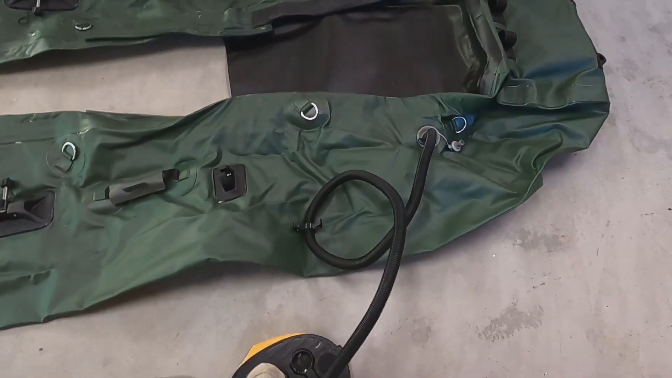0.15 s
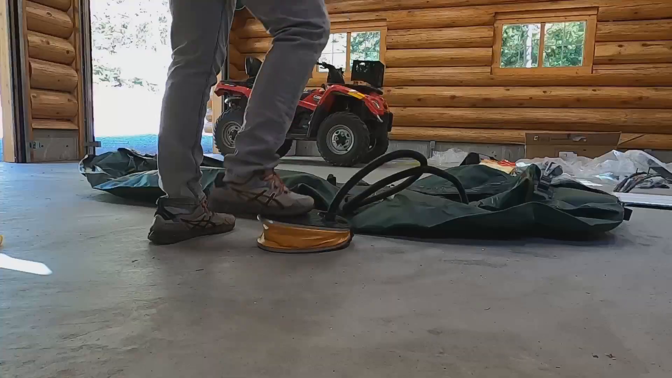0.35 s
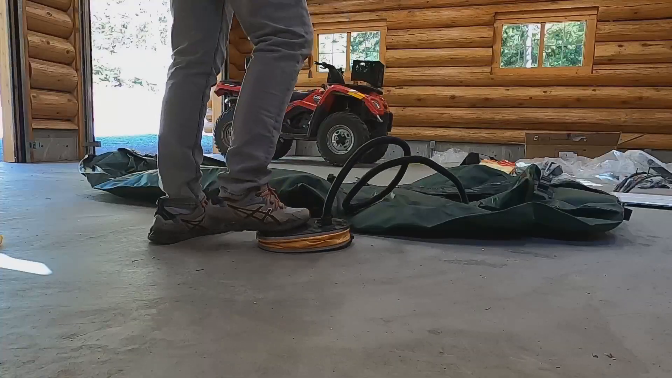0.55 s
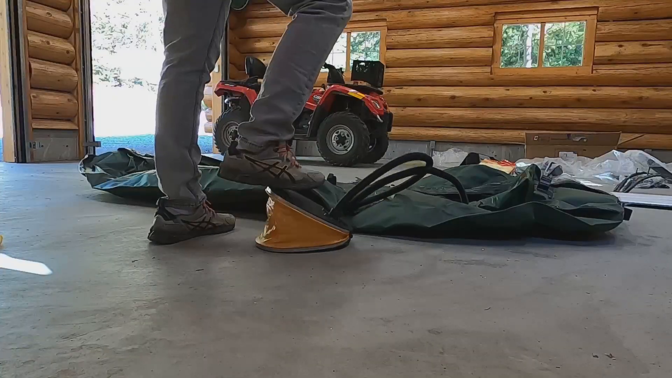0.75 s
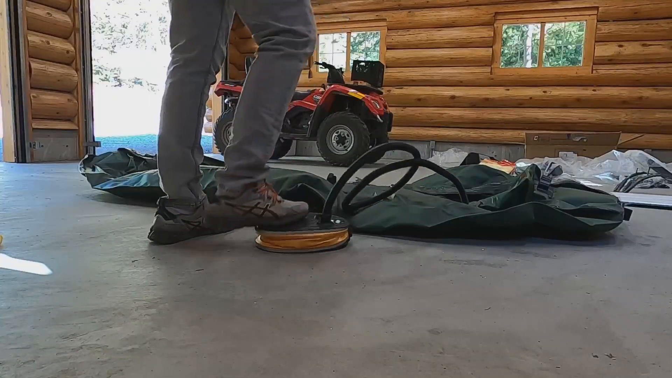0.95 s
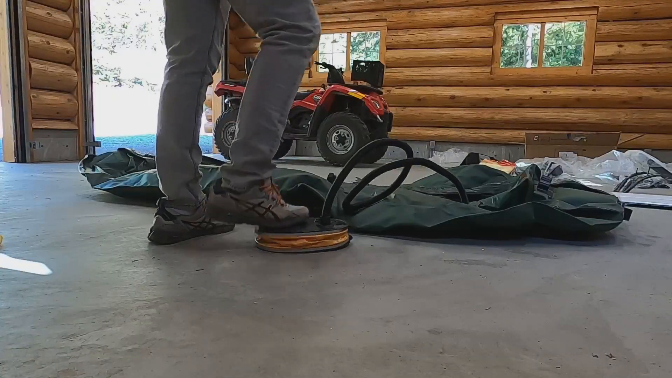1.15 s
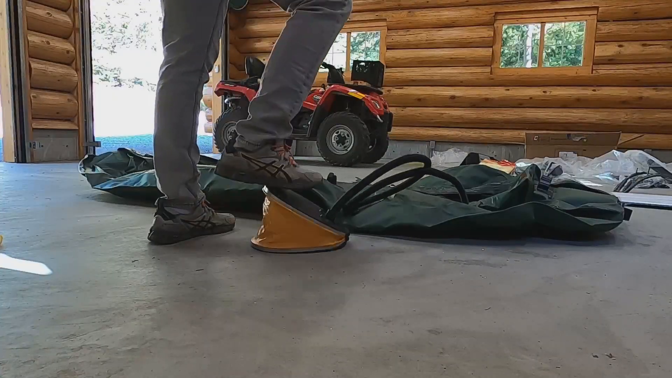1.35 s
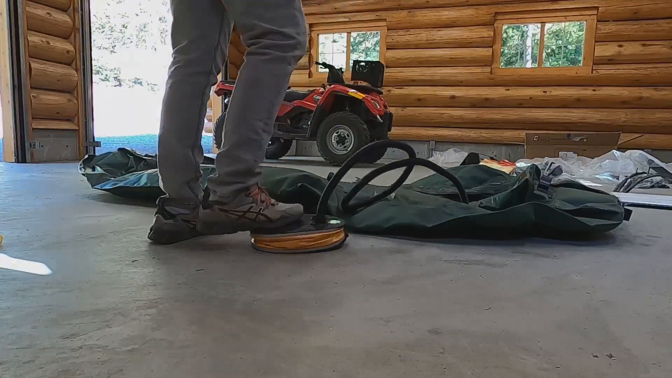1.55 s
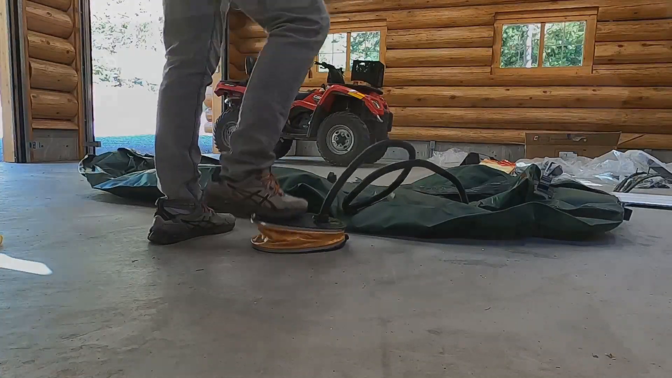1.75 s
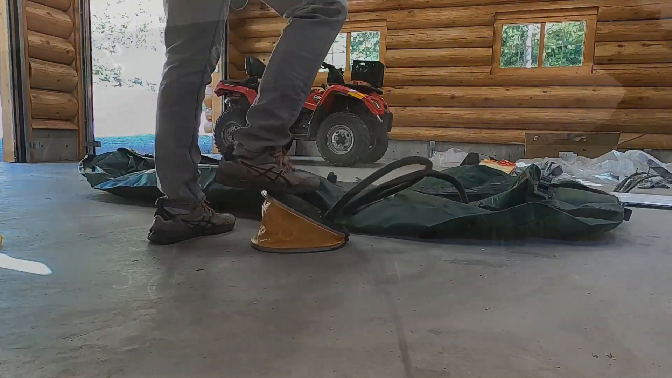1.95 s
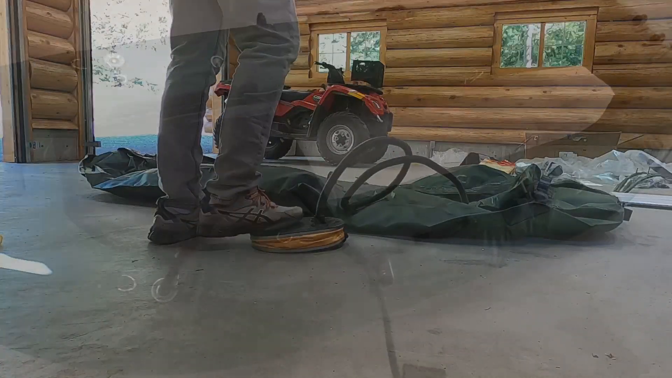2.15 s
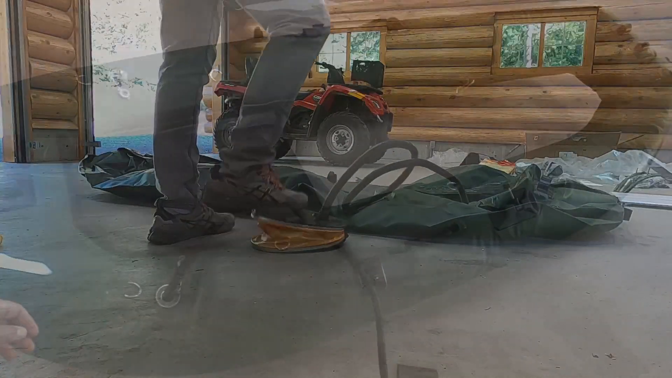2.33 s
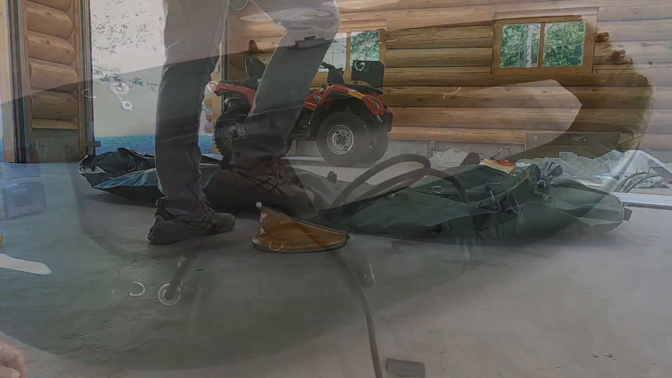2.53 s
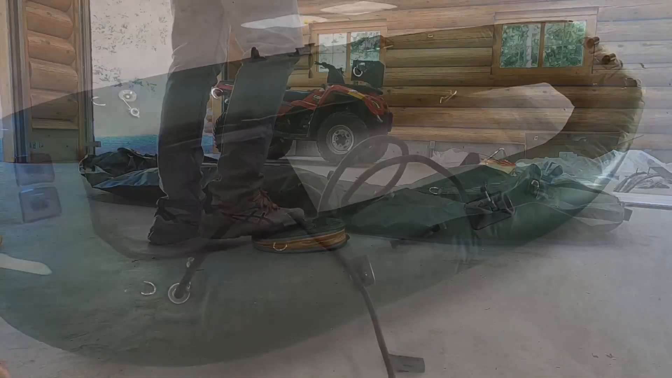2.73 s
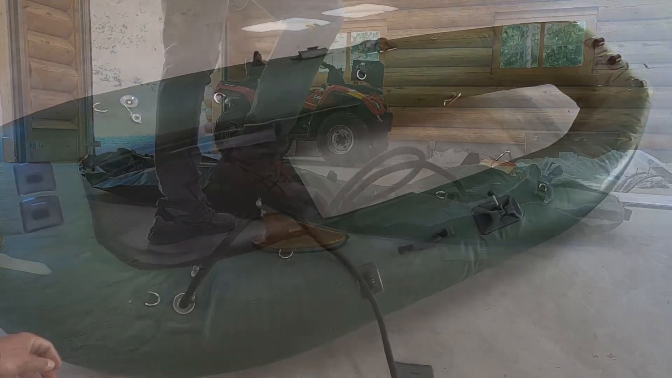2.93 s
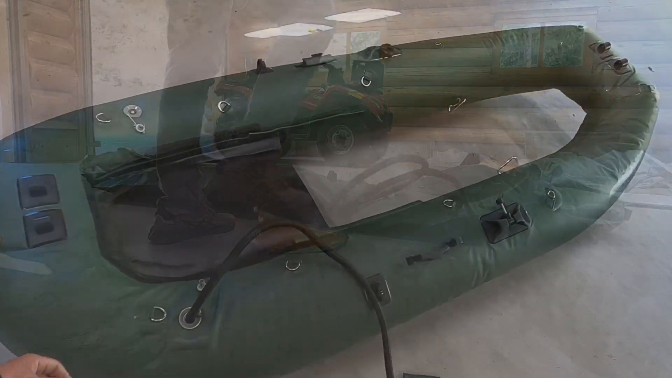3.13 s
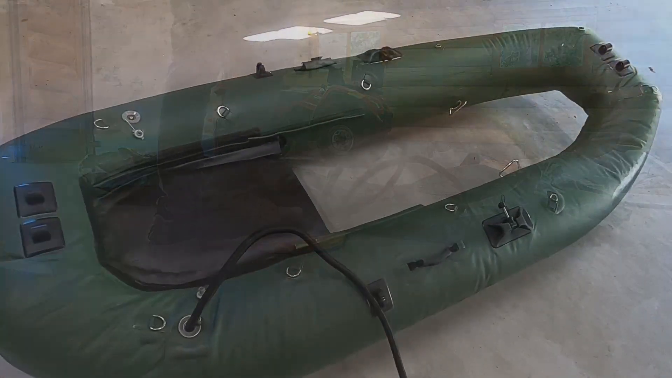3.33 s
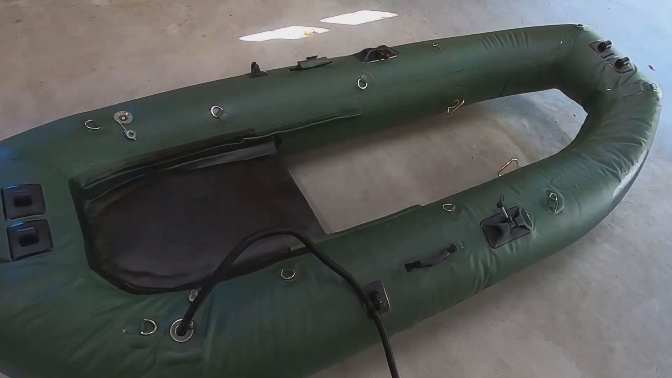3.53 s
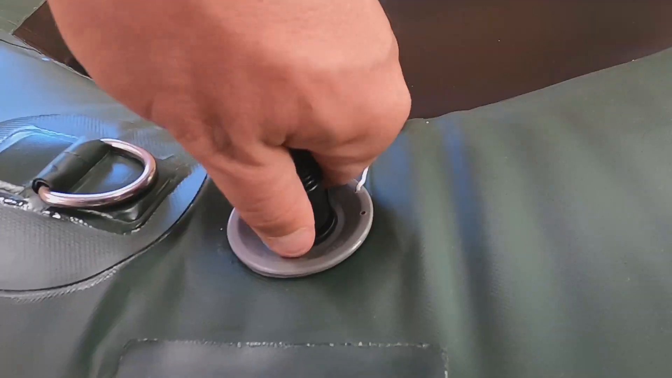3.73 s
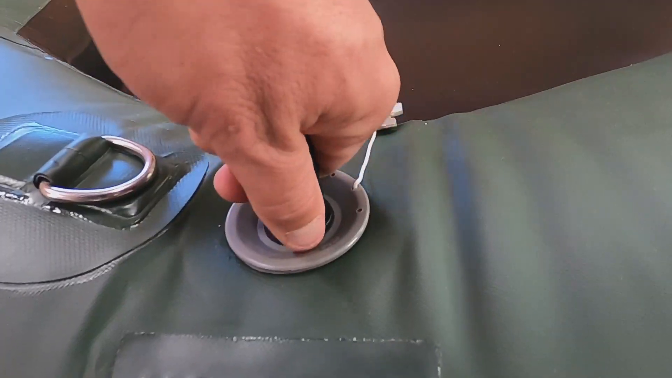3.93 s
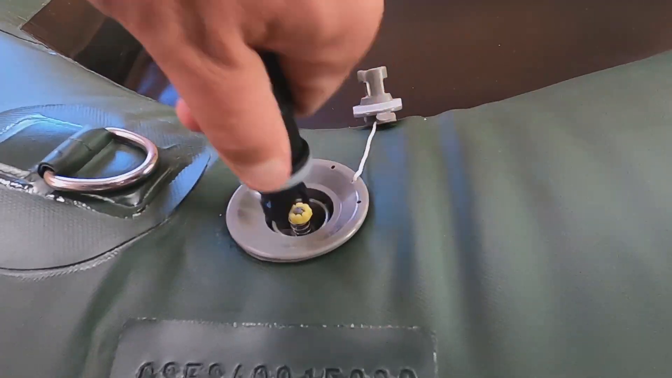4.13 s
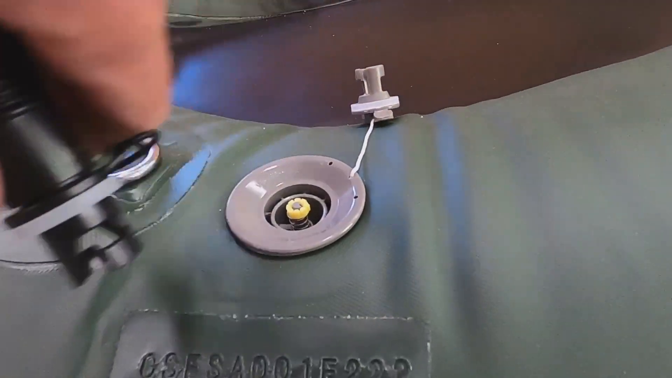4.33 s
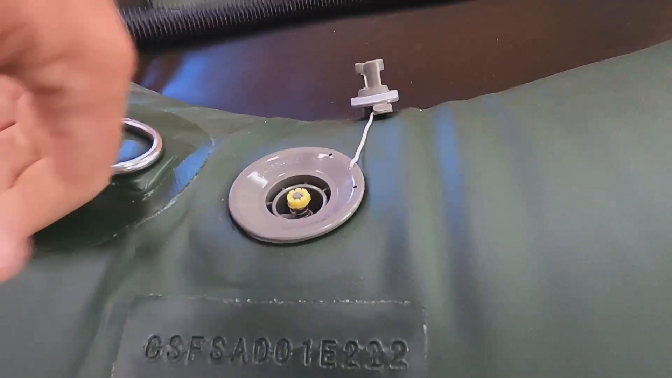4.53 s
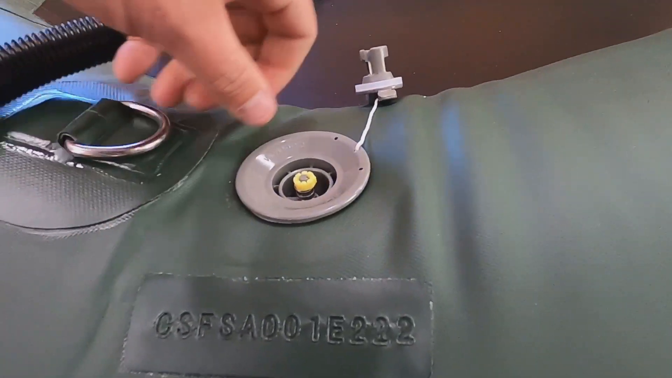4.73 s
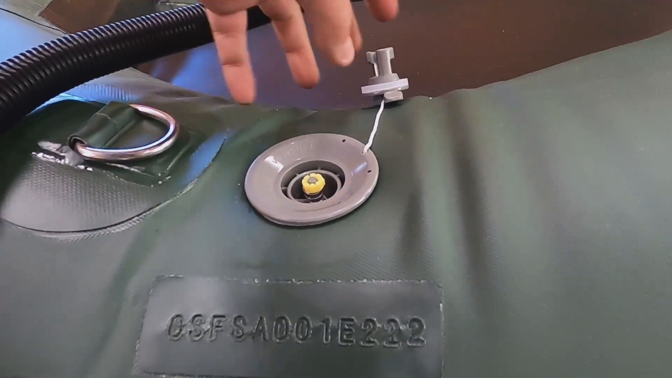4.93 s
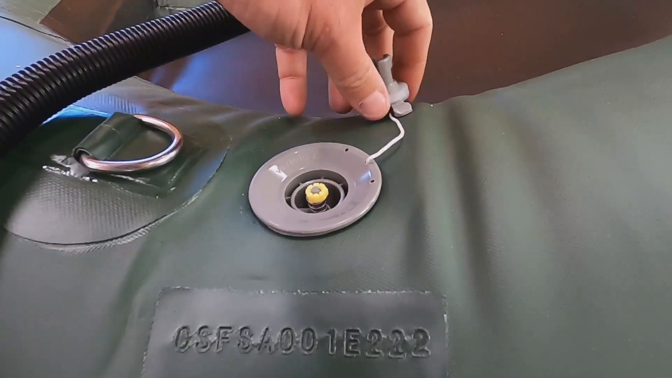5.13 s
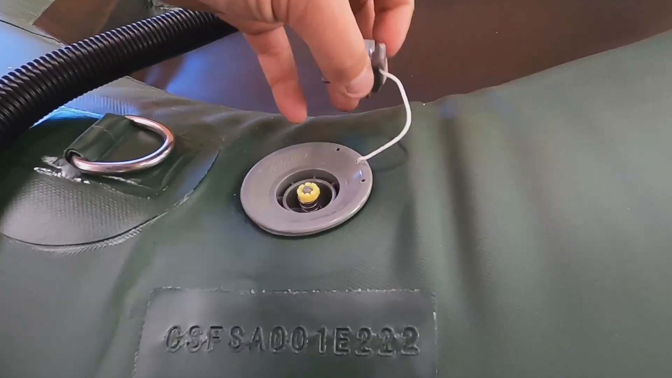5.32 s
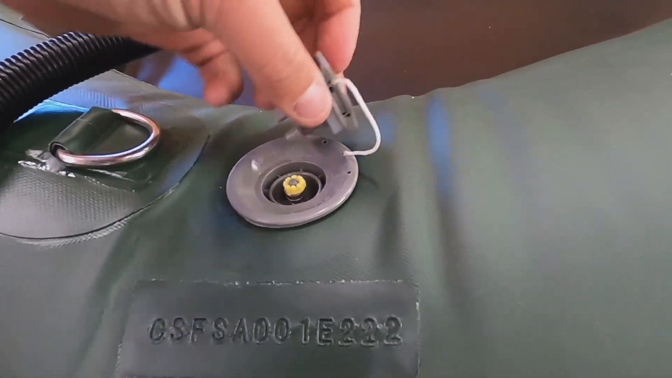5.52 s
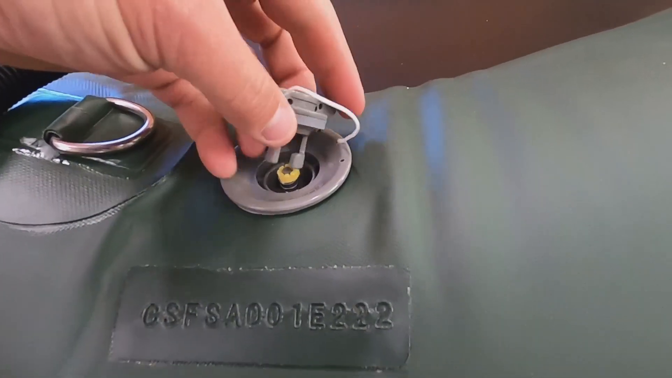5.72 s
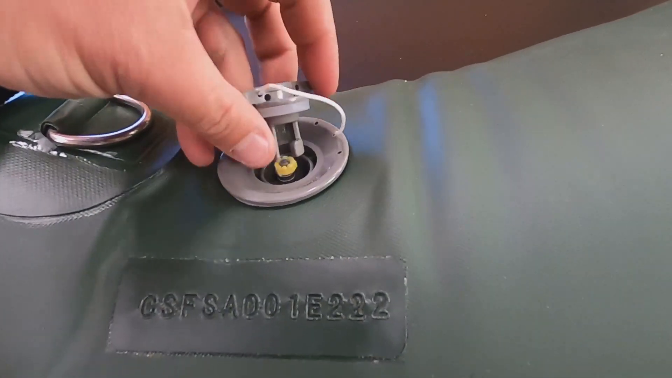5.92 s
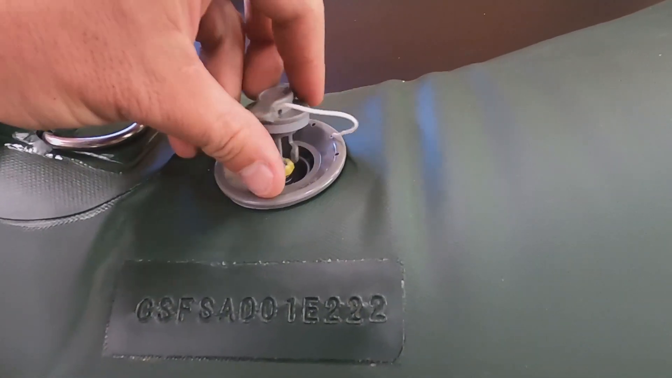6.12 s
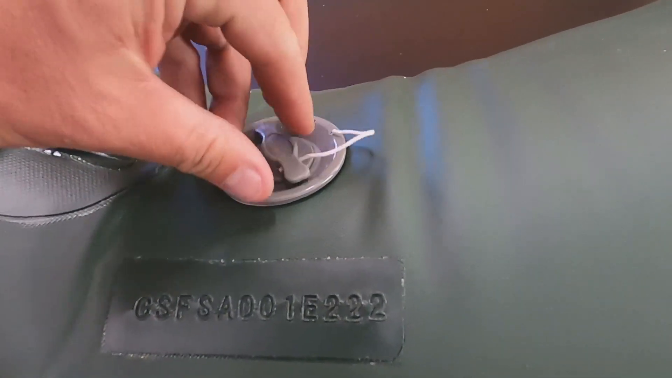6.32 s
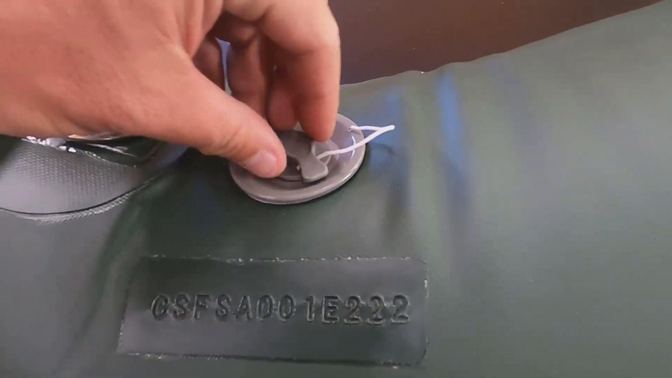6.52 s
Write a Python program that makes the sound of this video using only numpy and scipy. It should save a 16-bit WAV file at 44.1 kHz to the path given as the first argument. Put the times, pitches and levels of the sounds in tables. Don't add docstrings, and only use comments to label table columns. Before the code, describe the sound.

Garage echo surrounds a foot pump. From 0 to 0.34 s, one tread thumps and air hisses with a high whistle before a hard cut. Knocks and slaps at 0.4 s start a steady rhythm, with presses near 0.45, 1.0, 1.55, 2.15 and 2.7 s. Each brings a rough rush of air and wavering whistles around 5 to 6 kHz, then a brief hoarse bellows wheeze. From 2.3 s the whistles drop lower; around 3.1 to 3.5 s only faint notes near 3 kHz and weak breaths of air remain, with a last knock at 3.67 s. At 3.72 s everything becomes close and quiet. A seal creaks softly, rising then easing, and a sharp puff bursts at 4.12 s. Hose bumps and scuffs follow until 5.3 s. After near silence, the cap ticks and scrapes from 5.88 s, clattering brightest at 6.3 to 6.5 s.

```python
import sys
import numpy as np
from scipy import signal
from scipy.fft import rfft, irfft, next_fast_len
from scipy.io import wavfile
from scipy.ndimage import uniform_filter1d

SR = 44100
rng = np.random.default_rng(int(sys.argv[2]) if len(sys.argv) > 2 else 0)


def pcm_store(signal):
    levels = np.round(np.clip(np.atleast_2d(signal), -1, 1) * 32767)
    wavfile.write(sys.argv[1], SR, levels.astype(np.int16).T)


def volts_from_decibels(level):
    exponent = np.asarray(level, float) / 20
    return 10 ** exponent


N = 294147


def read(points, hz):
    f, value = np.transpose(points)
    return np.interp(np.log(hz + 1), np.log(f + 1), value)


def evened(x):
    return x / np.sqrt(np.mean(x ** 2) + 1e-20)


CUTS = [
    0,
    .336,
    3.724,
    6.67,
]


def add(mix, s, sound):
    end = min(cut for cut in CUTS if cut > s + .002)
    part = mix[..., round(s * SR):round(end * SR)][..., :sound.shape[-1]]
    part += sound[..., :part.shape[-1]]


def follow(tables, column):
    t, out = np.arange(N) / SR, np.full(N, -120.)
    for rows in tables:
        rows = np.array(rows)
        inside = (t >= rows[0, 0]) & (t <= rows[-1, 0])
        out[inside] = np.interp(t[inside], rows[:, 0], rows[:, column])
    return uniform_filter1d(out, size=64)


def resonate(x, hz, width_hz):
    turn = np.exp(2j * np.pi * np.cumsum(hz * np.ones(len(x))) / SR)
    r = np.exp(-np.pi * width_hz / SR)
    return 2 * (turn * signal.lfilter([1 - r], [1, -r], x / turn)).real


def narrow(x, hz, width_hz):
    pole = np.exp((2j * hz - width_hz) * np.pi / SR)
    return evened(signal.lfilter([1], np.poly([pole] * 3), x).real)


def ring(hz, db, t60, fuzz, rise):
    noise = rng.standard_normal(12000)[:round(1.5 * t60 * SR)]
    t = np.arange(len(noise)) / SR
    tone = (1 - fuzz) * np.sin(2 * np.pi * hz * t) + fuzz * narrow(noise, hz, 1.545 * hz)
    attack = np.sin(np.pi / 2 * np.minimum(t / rise, 1)) ** 2
    return volts_from_decibels(db - 60 * t / t60) * tone * attack


# frequency in Hz, likeness from 0 to 1.
LIKENESS = [(60, 0.94), (180, 1), (550, 0.78), (1650, 0.94), (4970, 0.16), (15000, 0.06)]


def hiss(colour, patchy_db, flicker_db, size=512):
    hop, hz = size // 4, np.fft.rfftfreq(size, 1 / SR)
    a, b, c, d, patches = rng.standard_normal((N // hop + 5, len(hz), 5)).T
    patches = uniform_filter1d(patches, size=5, axis=0)
    patches = evened(uniform_filter1d(patches, size=12, axis=1))
    flicker = evened(uniform_filter1d(patches[1] + a[0], size=3))
    same = np.clip(read(LIKENESS, hz), -1, 1)[:, None]
    left = a + 1j * b
    right = same * left + np.sqrt(1 - same ** 2) * (c + 1j * d)
    level_db = read(colour, hz)[:, None] + patchy_db * patches + flicker_db * flicker
    z = np.array([left, right]) * volts_from_decibels(level_db)
    return evened(signal.istft(z, nperseg=size, noverlap=size - hop)[1][:, :N])


# time in seconds, level in dB.
THIN_AIR = [
    [(0, -44.5), (.135, -44.5)],
    [(.336, -48.5), (2.4, -49), (3.2, -52), (3.724, -55.5)],
    [(3.724, -81), (3.8, -63), (3.92, -52.5), (4.1, -58)],
    [(4.19, -66), (5.2, -76.5), (5.45, -83.5), (5.88, -83.5), (6.05, -79), (6.67, -80.5)],
]
# frequency in Hz, level in dB per Hz.
ROAR_COLOUR = [(290, -43.5), (500, -5), (696, -12.5), (1070, 2.5), (1590, -6.5), (1920, 0.5), (2430, -0.5),
               (4550, -8), (5200, -11), (7000, -13), (9100, -22.5), (15400, -120)]
# frequency in Hz, level in dB per Hz.
FIZZ_COLOUR = [(3710, -26), (6300, -10), (7700, -8.5), (8100, -20.5), (8500, -9), (10000, -9.5),
               (11000, -12.5), (12200, -10), (13000, -14), (13800, -20.5), (14600, -27), (15600, -89)]


def airflow():
    roar, fizz = hiss(ROAR_COLOUR, 3.4, 0.94), hiss(FIZZ_COLOUR, 6.0, 0.83)
    return volts_from_decibels(follow(THIN_AIR, column=1)) * (volts_from_decibels(3.5) * roar + volts_from_decibels(-24.0) * fizz)


# time in seconds, boom in dB, rustle in dB.
SHAKES = [(0, -24.5, -34.5), (0.198, -50, -32), (0.458, -23.5, -31), (1.002, -26, -40), (1.6, -34, -33),
          (2.2, -31, -35), (2.72, -35, -37.5), (3.73, -51.5, -65), (3.86, -61, -48.5), (3.98, -70, -51),
          (4.122, -36, -33), (4.601, -39, -46.5), (4.851, -42.5, -50), (5.079, -43.5, -59.5),
          (5.3, -50, -67), (5.73, -69.5, -75), (5.95, -56.5, -53.5), (6.397, -34, -37.5)]
SWELL_DB_PER_S, SETTLE_DB_PER_S = [64, 105, 599.5], [43.5, 107.5, 113]


def shaken(column, bed_db):
    t, power = np.arange(N) / SR, volts_from_decibels(bed_db) ** 2
    for row in SHAKES:
        take = np.searchsorted(CUTS, row[0], "right") - 1
        inside = slice(round(CUTS[take] * SR), round(CUTS[take + 1] * SR))
        late = t[inside] - row[0]
        change_db = np.minimum(SWELL_DB_PER_S[take] * late, -SETTLE_DB_PER_S[take] * late)
        power[inside] += volts_from_decibels(row[column] + change_db) ** 2
    return np.sqrt(power)


# frequency in Hz, level in dB per Hz.
BOOM_COLOUR = [(12, -46.5), (20, -26.5), (59, -4.5), (102, -10.5), (134, 6), (161, 9), (269, -0.5),
               (367, -6.5), (500, -17.5), (650, -48.5), (1100, -120)]
# frequency in Hz, level in dB per Hz.
RUSTLE_COLOUR = [(180, -27), (300, 10.5), (333, -20.5), (472, -1.5), (674, -7.5), (1650, -11.5),
                 (2400, -35), (3120, -58.5), (5280, -120)]
BOOM_BED_DB, RUSTLE_BED_DB = 5.5, 2.5


def body():
    boom, rustle = hiss(BOOM_COLOUR, 3., 1.5, size=1024), hiss(RUSTLE_COLOUR, 2.5, 1.5)
    bed_db = follow(THIN_AIR[:2] + THIN_AIR[3:], column=1)
    boom = shaken(column=1, bed_db=bed_db + BOOM_BED_DB) * boom
    return boom + shaken(column=2, bed_db=bed_db + RUSTLE_BED_DB) * rustle


# time in seconds, knock in dB, knock in Hz, hinge crack in dB.
TREADS = [(0.137, -9.5, 526, -33.5), (0.217, -16.5, 1020, -21.5), (0.396, -7.5, 1044, -21.5),
          (0.423, -15, 1010, -31), (0.448, -14.5, 556, -32.5), (0.946, -22.5, 403, -52),
          (0.995, -17, 940, -34.5), (1.019, -13.5, 933, -29.5), (1.5256, -13.5, 868, -21),
          (1.5625, -10.5, 1040, -37.5), (1.575, -16.5, 564, -35), (2.063, -18, 1064, -34.5),
          (2.134, -14.5, 1014, -45.5), (2.156, -17, 600, -39), (2.1646, -12.5, 1005, -39.5),
          (2.634, -16.5, 1080, -37.5), (2.669, -24, 1070, -43.5), (2.688, -16, 930, -40),
          (2.96, -18, 370, -56), (3.123, -29, 2270, -39), (0.988, -17, 910, -40), (1.594, -29, 1190, -29),
          (3.261, -37.5, 1030, -55), (3.287, -32, 1070, -54), (3.33, -28.5, 994, -57),
          (3.61, -46, 2920, -66), (3.639, -23, 386, -67), (3.67, -16, 610, -58)]
# time in seconds, level in dB, pitch in Hz.
THUDS = [(0.021, -26, 150), (0.335, -13, 181), (0.374, -19, 220), (0.403, -8, 65.5), (0.426, -22, 231.4),
         (0.906, -14.5, 212), (0.979, -14, 288), (1.503, -14.5, 133), (1.531, -8.5, 136), (1.566, -12, 139),
         (1.587, -22, 92), (2.064, -18, 125), (2.16, -16.5, 233), (2.634, -16, 144), (3.287, -37, 234),
         (0.456, -22.5, 204), (3.688, -14, 269), (4.549, -39.5, 263), (4.598, -18.5, 147),
         (4.618, -21, 155), (4.711, -15, 256), (4.888, -28, 276), (4.929, -25, 179), (5.078, -27.5, 118),
         (5.267, -38, 219), (5.318, -41.5, 110.4), (5.711, -38, 70), (6.4, -27, 119), (6.493, -24, 87)]
# time in seconds, level in dB.
SLAPS = [(.4, -7), (0.442, -8), (0.4518, -7.5), (1.53, -6), (1.5638, -6), (1.575, -7), (2.064, -15),
         (2.07, -15), (2.134, -10.5), (2.156, -6.5), (6.398, -14), (6.439, -15), (6.456, -17.5),
         (6.473, -20.5), (6.542, -26)]


def treads():
    out = np.zeros(N)
    for s, db, hz, crack_db in TREADS:
        add(out, s, ring(hz, db + 1.5, 0.029, 0.4, 0.00045))
        add(out, s, ring(2400, crack_db + 6.5, 0.025, 0.68, 0.00076))
        add(out, s, ring(249, db + 1.5, 0.048, 0.51, 0.0038))
    for s, db, hz in THUDS:
        add(out, s, ring(hz, db + 1.5, 0.085, 0.44, 0.0036))
    for s, db in SLAPS:
        add(out, s, -ring(268, db + 2.0, 0.016, .12, 0.0016))
    return out


# start in seconds, end in seconds, roar in dB, fizz in dB.
STROKES = [
    (0.109, 0.363, -24.5, -45.5),
    (0.432, 0.693, -27.5, -41.5),
    (0.992, 1.269, -26, -41),
    (1.563, 1.83, -26, -40),
    (2.129, 2.407, -29.5, -42.5),
    (2.677, 2.899, -35.5, -47.5),
    (3.047, 3.34, -45, -57.5),
    (3.264, 3.514, -48.5, -67),
]
HOSE_STEP_HZ = 87
VORTEX_HZ, VORTEX_DB = 6350, -7.5
NECK_HZ, NECK_WIDTH_HZ, NECK_DB = 1890, 160, -11.5


def strokes():
    roar, fizz = hiss(ROAR_COLOUR, 2.4, 1.9), hiss(FIZZ_COLOUR, 3.6, 1.9)
    out = np.zeros((2, N))
    for on, off, roar_db, fizz_db in STROKES:
        a, b = round(on * SR), round(off * SR)
        u = np.linspace(0, 1, b - a)
        speed = np.clip((u - .08) / 0.37, 0, 1) ** 0.72 * np.minimum((1 - u) / 0.86, 1) ** 0.78
        leak = np.minimum(u / .025, 1) * (0.59 + 0.66 * speed) * np.minimum((1 - u) / 0.53, 1)
        hz = VORTEX_HZ * (0.33 + 0.64 * np.maximum.accumulate(speed))
        noise = rng.standard_normal(b - a)
        trip = round(SR / HOSE_STEP_HZ)
        combed = noise + 0.8 * np.roll(noise, trip) + 0.5 * np.roll(noise, 2 * trip)
        vortex = evened(resonate(resonate(combed, hz, 520), hz, 700))
        neck = narrow(noise, NECK_HZ, 2 * NECK_WIDTH_HZ)
        jet = volts_from_decibels(roar_db) * speed ** 0.94 * roar[:, a:b] + volts_from_decibels(fizz_db) * leak * fizz[:, a:b]
        jet = jet + volts_from_decibels(roar_db + VORTEX_DB) * speed * vortex
        add(out, on, jet + volts_from_decibels(roar_db + NECK_DB) * speed * neck)
    return out


# start in seconds, end in seconds, pitch in Hz, level in dB.
WHISTLES = [(.2, .31, 5590, -30), (.23, .42, 5833, -20), (.2, .44, 6003, -25), (.16, .25, 4750, -38),
            (.53, .68, 5176, -24), (.53, .65, 4915, -33), (.54, .63, 5008, -31), (.605, .75, 4976, -21),
            (.55, .8, 5657, -38), (.62, .76, 4785, -32), (.63, .72, 4880, -29), (.7, .96, 4978, -35),
            (1.12, 1.36, 5830, -28), (1.125, 1.28, 5912, -24), (1.28, 1.42, 5918, -40),
            (1.14, 1.24, 5748, -34), (1.15, 1.3, 5066, -30), (1.28, 1.46, 5066, -47),
            (1.18, 1.37, 4785, -33), (1.11, 1.18, 3025, -37), (1.68, 1.83, 5745, -20),
            (1.68, 1.92, 5834, -27), (1.82, 1.98, 5740, -38), (1.73, 1.87, 5916, -34),
            (1.755, 1.89, 4786, -31), (1.76, 1.82, 4600, -30), (1.76, 1.82, 4950, -33),
            (2.195, 2.27, 4748, -36), (2.265, 2.43, 5832, -29), (2.25, 2.42, 5920, -30),
            (2.27, 2.35, 5747, -32), (2.26, 2.44, 5066, -30), (2.42, 2.6, 5062, -48),
            (2.35, 2.46, 8250, -47), (2.35, 2.45, 8420, -47), (1.63, 1.75, 5200, -28),
            (2.345, 2.6, 4139, -24), (2.48, 2.74, 4138, -33), (2.32, 2.41, 4320, -37),
            (2.36, 2.44, 3965, -39), (2.73, 2.8, 4290, -39), (2.745, 2.84, 4655, -35),
            (2.78, 2.93, 4908, -31), (2.84, 2.96, 4982, -36), (2.82, 3, 5850, -47), (.13, .18, 3520, -38),
            (.14, .22, 4390, -38), (.16, .26, 5100, -35), (.66, .72, 4390, -41)]
# start in seconds, end in seconds, pitch in Hz,
# level in dB.
LOW_WHISTLES = [(3.09, 3.22, 3010, -41), (3.13, 3.26, 3010, -32), (3.225, 3.35, 2990, -36),
                (3.335, 3.45, 2990, -34), (3.44, 3.56, 2988, -46), (3.52, 3.64, 2985, -51),
                (3.09, 3.22, 3095, -45), (3.17, 3.3, 3090, -38), (3.26, 3.42, 3085, -45),
                (3.44, 3.58, 3075, -53), (3.17, 3.33, 2730, -45), (3.26, 3.33, 2720, -46)]
# delay after the stroke starts in seconds, length in seconds, pitch in Hz, level in dB over the roar.
RUNGS = [
    (.03, .05, 3815, -13),
    (.035, .04, 4270, -13),
    (0.055, .055, 4560, -8),
    (.06, .06, 4760, -12),
    (.065, .12, 5200, -5),
    (.1, .07, 5560, -11),
]
NEIGHBOUR_DB, RUNG_NEIGHBOUR_DB = -13, -1


def notes():
    out = [(*row, NEIGHBOUR_DB) for row in WHISTLES + LOW_WHISTLES]
    for on, _, roar_db, _ in STROKES[1:6]:
        for late, length, hz, db in RUNGS:
            out.append((on + late, on + late + length, hz, roar_db + db, RUNG_NEIGHBOUR_DB))
    return out


def whistles():
    out = np.zeros(N)
    for on, off, hz, db, side_db in notes():
        count = round((off - on) * SR)
        noise = rng.standard_normal((4, count))
        drift = evened(uniform_filter1d(uniform_filter1d(noise[0], size=500), size=500))
        waver = 1 + .2 * drift
        sag = 1 + .0007 * drift[::-1] - np.linspace(-.001, .001, count)
        main = 1.28 * waver * np.sin(2 * np.pi * hz * np.cumsum(sag) / SR)
        upper = resonate(noise[1], hz + HOSE_STEP_HZ, 26.95)
        lower = resonate(noise[2], hz - HOSE_STEP_HZ, 25)
        sides = evened(upper + lower)
        skirt = evened(resonate(resonate(noise[3], hz, 320), hz, 480))
        u = np.linspace(0, 1, count)
        swell = np.minimum(u / 0.2, 1) * np.minimum((1 - u) / 0.68, 1)
        note = volts_from_decibels(db) * swell * (main + volts_from_decibels(side_db) * sides + volts_from_decibels(side_db - 1.5) * skirt)
        octave = note ** 2 - uniform_filter1d(note ** 2, size=40)
        add(out, on, note + volts_from_decibels(3.0) * octave)
    return out


# start in seconds, end in seconds, level in dB.
REFILLS = [
    (0.743, 0.907, -33),
    (1.302, 1.453, -28.5),
    (1.871, 2.007, -29.5),
    (2.437, 2.565, -34.5),
    (2.992, 3.138, -45.5),
    (3.36, 3.552, -45.5),
]


def plate_lifts():
    out = np.zeros(N)
    for s, _, db in REFILLS:
        add(out, s - 0.069, ring(60.4, db + 3, 0.3, .55, 0.02))
    return out


# frequency in Hz, width in Hz, level in dB.
INLET = [(949, 110, -2), (1300, 160, 2), (1596, 89, -8.5), (1210, 890, 4), (3070, 420, -3.5)]
SLIDE_FROM, SLIDE_TO = 0.89, 1.005


def refills():
    out = np.zeros(N)
    for on, off, db in REFILLS:
        noise = rng.standard_normal(12000)[:round((off - on) * SR)]
        u = np.linspace(0, 1, len(noise))
        slide = SLIDE_FROM + (SLIDE_TO - SLIDE_FROM) * np.sin(np.pi / 2 * np.minimum(u / 0.6, 1))
        inlet = np.zeros(len(noise))
        for hz, width, peak_db in INLET:
            peak = resonate(resonate(noise, hz * slide, width), hz * slide, 2 * width)
            inlet += volts_from_decibels(peak_db) * evened(peak)
        swell = np.minimum(u / 0.19, 1) * np.minimum((1 - u) / 0.4, 1)
        add(out, on, volts_from_decibels(db) * evened(inlet) * swell)
    return out


# time in seconds, level in dB, pitch in Hz.
PINGS = [(3.124, -43.5, 6640), (3.611, -41, 2940), (4.276, -28, 3700), (4.417, -56.5, 8200),
         (4.492, -47.5, 6890), (6.2, -52, 8300), (5.891, -38.5, 3300), (5.954, -53, 7600),
         (5.977, -46, 5200), (5.978, -49.5, 7500), (5.992, -44.5, 4800), (6.014, -53, 3000),
         (6.184, -49.5, 7500), (6.198, -32, 7450), (6.204, -41.5, 2800), (6.275, -48, 7400),
         (6.339, -22, 7400), (6.342, -20.5, 5700), (6.342, -31.5, 3600), (6.373, -22, 3670),
         (6.387, -18.5, 3500), (6.392, -14.5, 3300), (6.396, -17.5, 3500), (6.397, -26.5, 5700),
         (6.493, -35, 3420), (6.52, -33.5, 2700), (6.522, -33, 3300), (6.529, -37.5, 2900)]


def pings():
    out = np.zeros(N)
    for s, db, hz in PINGS:
        add(out, s, ring(hz, db, 0.015, 0.16, 0.00056))
    return out


# time in seconds, pitch in Hz, level in dB.
CREAK = [
    (3.8, 195, -56),
    (3.85, 284, -47.5),
    (3.9, 415, -53),
    (3.925, 462, -39.5),
    (4.0, 415, -47),
    (4.08, 297, -53.5),
]
# time in seconds, level in dB.
BUFFET = [
    (4.115, -31),
    (4.169, -23.5),
    (4.42, -57),
]
# time in seconds, level in dB.
PUFF = [
    (4.098, -60.5),
    (4.118, -25),
    (4.124, -18.5),
    (4.16, -17.5),
    (4.18, -26),
    (4.19, -57),
]
# frequency in Hz, level in dB per Hz.
PUFF_COLOUR = [(350, -45), (600, -24.5), (867, -25.5), (1060, -11.5), (1140, -11), (1860, -13.5),
               (2020, -11), (4090, -4.5), (6330, -13.5), (10900, -15), (15600, -33.5)]


def adapter():
    near = slice(round(CUTS[2] * SR), round((CUTS[2] + 1) * SR))
    out = np.zeros((2, N))
    pitch = np.maximum(follow([CREAK], column=1), 100)[near]
    noise = rng.standard_normal(SR)
    slips = np.zeros(SR)
    for k, gain in [(1, 0.93), (2, 0.08)]:
        slips += gain * evened(resonate(resonate(noise, k * pitch, 90), k * pitch, 160))
    out[:, near] = volts_from_decibels(follow([CREAK], column=2)[near]) * slips
    out[:, near] += volts_from_decibels(follow([BUFFET], column=1)[near]) * narrow(noise, 65, 190)
    puff = volts_from_decibels(follow([PUFF], column=1)) * hiss(PUFF_COLOUR, 0.47, 1.0, size=256)
    return out + puff * volts_from_decibels([[-2.5], [2.5]])


# time in seconds, knock in dB, knock in Hz, tick in dB.
DROPS = [(4.12, -7.5, 412, -11), (4.224, -14.5, 860, -38), (4.277, -30, 500, -32),
         (4.588, -18.5, 470, -25.5), (4.69, -27, 590, -37.5), (4.71, -14, 917, -19),
         (4.888, -29, 417, -33.5), (4.929, -32, 447, -37), (5.038, -32.5, 550, -42), (4.248, -25, 700, -38),
         (4.29, -33, 1204, -47), (4.61, -25.5, 1190, -43), (4.627, -31, 900, -55),
         (4.672, -45, 1500, -50.5), (4.797, -35.5, 1300, -57), (5.242, -44.5, 897, -61.5),
         (5.281, -23.5, 616, -37), (5.262, -30, 703, -53), (5.318, -41, 1200, -55)]
# time in seconds, knock in dB, knock in Hz, tick in dB.
RATTLES = [(5.881, -47.5, 2194, -68), (5.891, -27, 1990, -66), (5.897, -26, 1620, -65.5),
           (5.905, -29, 450, -66), (5.9945, -26, 1870, -55), (6.002, -30, 1830, -58),
           (6.005, -28.5, 910, -62), (5.98, -26.5, 420, -60.5), (6.267, -26, 2090, -54.5),
           (5.927, -31, 1614, -67), (5.953, -22.5, 1830, -56.5), (5.954, -24, 700, -61),
           (5.977, -21.5, 1750, -51), (5.991, -23.5, 1950, -49.5), (5.998, -19, 1630, -55),
           (6.014, -33.5, 1590, -57), (6.139, -31.5, 1420, -58), (6.184, -25, 1760, -56.5),
           (6.195, -15, 1300, -27.5), (6.1975, -21, 523, -55), (6.441, -27, 1500, -52.5),
           (6.457, -31, 900, -48.5), (6.246, -28, 1660, -67), (6.271, -23, 1840, -52),
           (6.318, -19.5, 1800, -46.5), (6.3205, -20, 1980, -49.5), (6.323, -17.5, 617, -49),
           (6.339, -18, 490, -28.5), (6.373, -8, 694, -30.5), (6.386, -15, 840, -21.5),
           (6.393, -12, 468, -16), (6.397, -17, 1100, -16.5), (6.429, -5, 1580, -33),
           (6.448, -39, 1500, -38), (6.475, -28, 1300, -51.5), (6.494, -17.5, 450, -40),
           (6.497, -33, 900, -49.5), (6.521, -14, 1160, -44), (6.529, -17.5, 1104, -56)]


def blows():
    out = np.zeros(N)
    for table, thud_db in (DROPS, -5.5), (RATTLES, -12):
        for s, db, hz, tick_db in table:
            add(out, s, ring(hz, db + 1.0, 0.016, 0.33, 0.0008))
            add(out, s, ring(3830, tick_db, 0.014, 0.74, 0.00016))
            add(out, s, ring(226, db + thud_db, 0.038, 0.79, 0.00054))
    return out


# start in seconds, end in seconds, level in dB, centre in Hz, width in Hz.
SCUFFS = [(4.201, 4.337, -43, 2460, 4000), (4.582, 4.748, -46, 2015, 4930), (4.708, 4.84, -48, 2365, 4380),
          (4.862, 4.962, -49.5, 3200, 4620), (4.997, 5.133, -58, 2200, 4000),
          (5.241, 5.359, -54, 1148, 1910), (5.897, 5.935, -44.5, 1850, 1300),
          (5.969, 6.027, -40, 1905, 1400), (6.14, 6.176, -56.5, 1428, 1490), (6.015, 6.141, -61, 1960, 499),
          (6.205, 6.245, -57, 2000, 1500), (6.28, 6.336, -42, 1700, 960), (6.315, 6.382, -39, 2350, 3600),
          (6.394, 6.397, -26.5, 3680, 5050), (6.418, 6.486, -55, 2976, 5980)]


def scuffs():
    out = np.zeros(N)
    for on, off, db, hz, width_hz in SCUFFS:
        size, noise = rng.standard_normal((2, 9000))[:, :round((off - on) * SR)]
        grains = noise * volts_from_decibels(5.8 * evened(uniform_filter1d(size, size=60)))
        u = np.linspace(0, 1, len(noise))
        swell = np.minimum(u / 0.047, 1) * (1 - u) ** 0.62
        add(out, on, volts_from_decibels(db) * narrow(grains, hz, width_hz) * swell)
    return out


# frequency in Hz, decay by 60 dB in seconds.
GARAGE_DECAY = [(60, 0.6), (300, 0.69), (1500, 0.4), (5000, 0.63), (9000, 0.44), (14000, 0.18)]


def garage(x):
    taps = np.zeros((2, SR))
    at = np.arange(300, SR - 20, 20) + rng.integers(0, 20, (2, (SR - 301) // 20))
    np.put_along_axis(taps, at, rng.choice([-1., 1.], at.shape), 1)
    taps[1] = 0.88 * taps[0] + 0.3 * taps[1]
    hz, t, z = signal.stft(taps, SR, nperseg=256)
    decay = volts_from_decibels(-60 * t / read(GARAGE_DECAY, hz)[:, None])
    tail = signal.istft(z * decay, SR, nperseg=256)[1]
    tail = tail / np.linalg.norm(tail[0])
    out = np.zeros((2, N))
    edges = np.minimum(np.round(np.array(CUTS) * SR).astype(int), N)
    for a, b in zip(edges, edges[1:]):
        out[:, a:b] = signal.fftconvolve(x[None, a:b], tail, axes=1)[:, :b - a]
    return out


def scene():
    feet, air, hose = treads() + plate_lifts(), strokes(), whistles()
    wheeze, seal = refills(), adapter()
    hits = pings() + blows() + scuffs()
    far = volts_from_decibels(-11.0) * hose + volts_from_decibels(-2.0) * air[0] + volts_from_decibels(-2.5) * wheeze + volts_from_decibels(-6.5) * feet
    echo = garage(far + volts_from_decibels(-19.0) * hits + volts_from_decibels(-24.0) * seal[1])
    near = hose * volts_from_decibels([[.3], [-.6]]) + air + feet + hits * volts_from_decibels([[-.6], [.6]]) + seal + wheeze
    return near + echo + airflow() + body()


def band_limit(x):
    return signal.sosfilt(signal.butter(12, 15700, fs=SR, output="sos"), x)


# frequency in Hz, left over right in dB.
PORT_LEAN = [(60, -1), (180, -0.5), (550, -0.5), (1650, 1), (4970, 1.5), (15000, -4)]
PORT_TURN_HZ = 4000


def record(dry):
    size = next_fast_len(N)
    hz = np.fft.rfftfreq(size, 1 / SR)
    half = volts_from_decibels(read(PORT_LEAN, hz) / 2) * np.exp(-1j * 0.77 * np.tanh(hz / PORT_TURN_HZ))
    ports = irfft(rfft(dry, size) * np.array([half, 1 / half]), size)[:, :N]
    ports = .62 * np.tanh(ports / .62)
    return band_limit(ports)


dry = scene()
out = record(dry)
pcm_store(out)
```